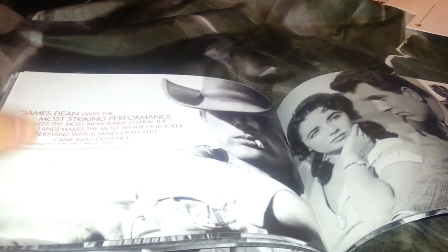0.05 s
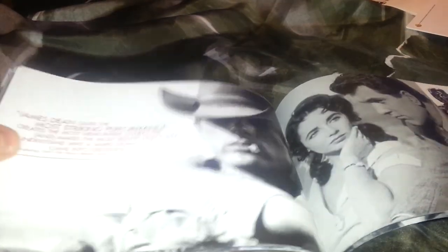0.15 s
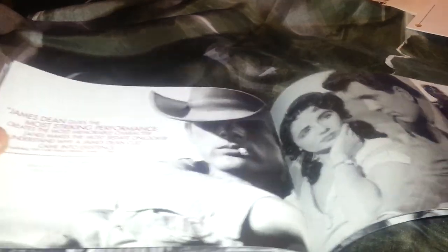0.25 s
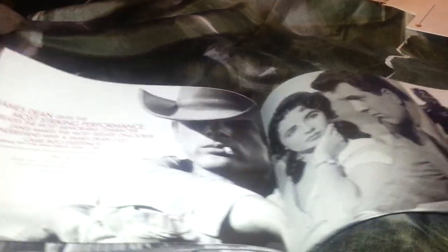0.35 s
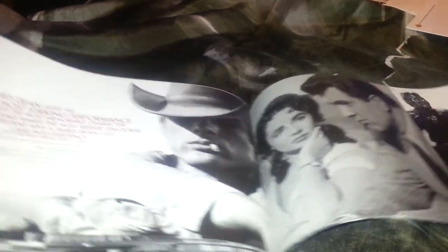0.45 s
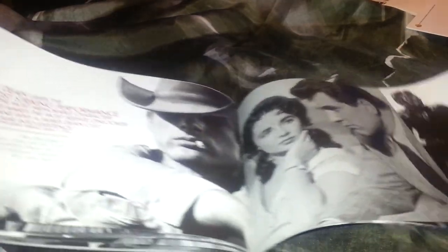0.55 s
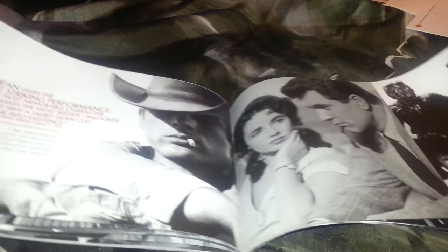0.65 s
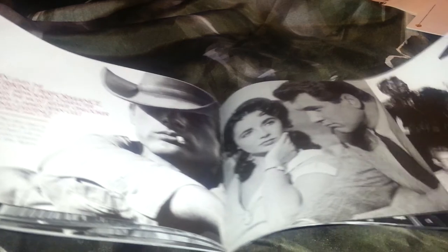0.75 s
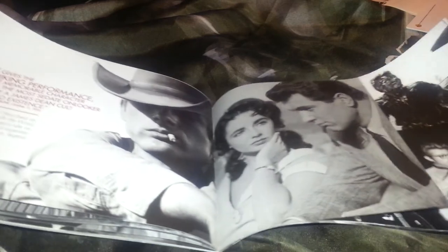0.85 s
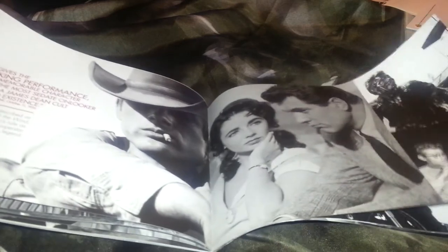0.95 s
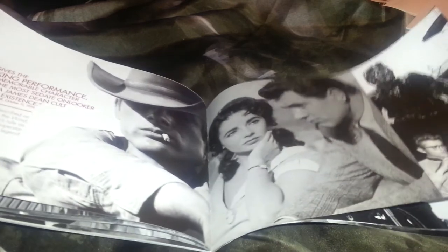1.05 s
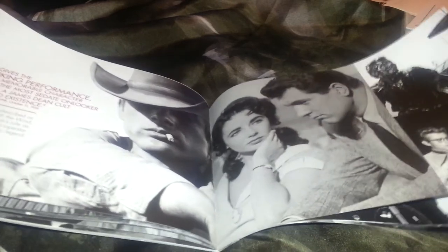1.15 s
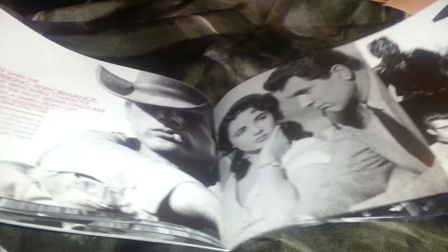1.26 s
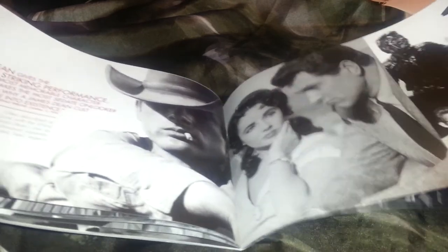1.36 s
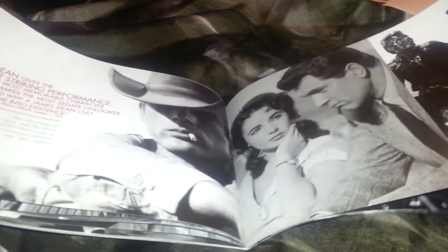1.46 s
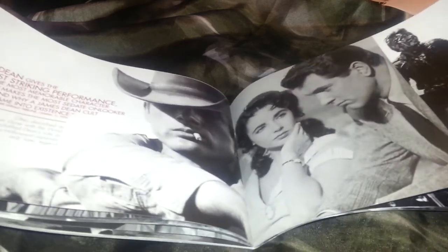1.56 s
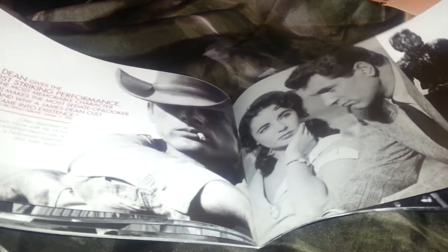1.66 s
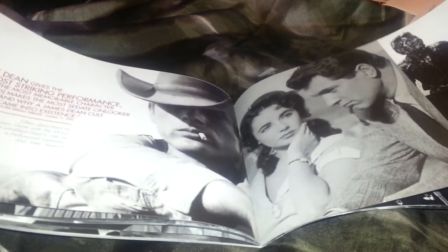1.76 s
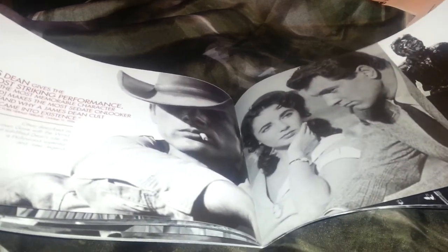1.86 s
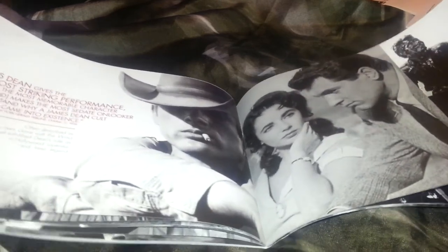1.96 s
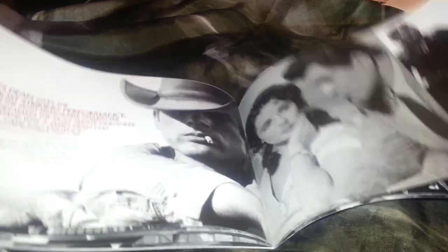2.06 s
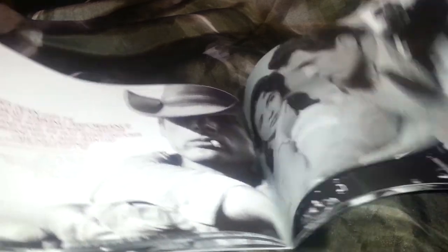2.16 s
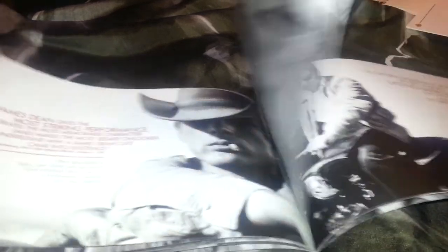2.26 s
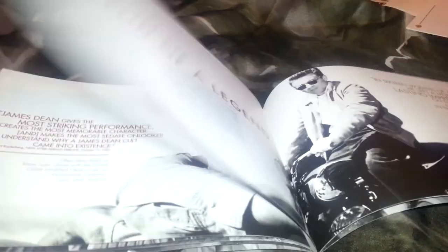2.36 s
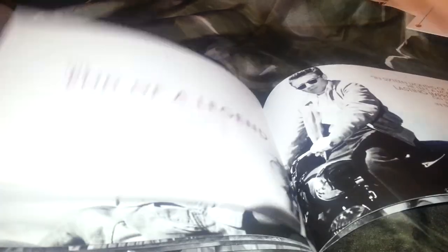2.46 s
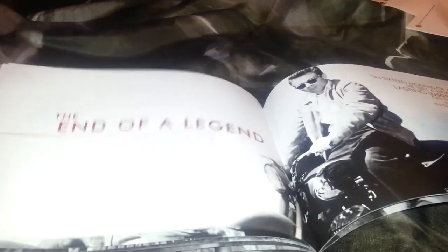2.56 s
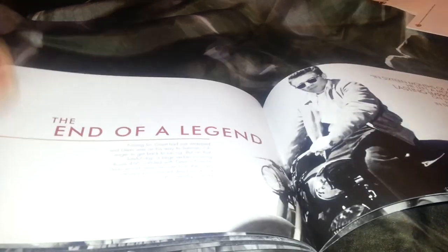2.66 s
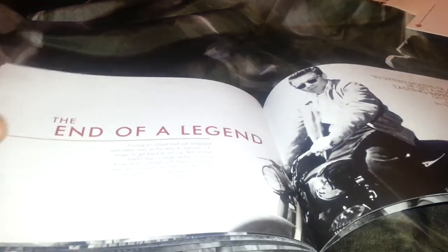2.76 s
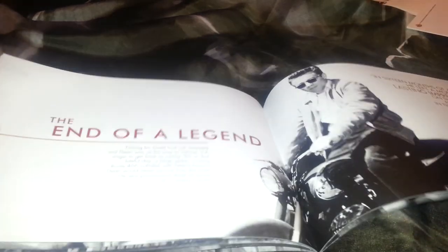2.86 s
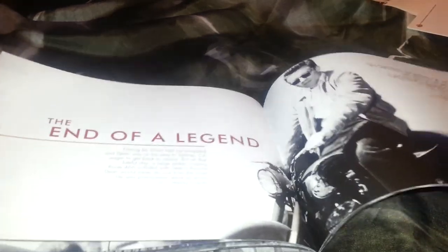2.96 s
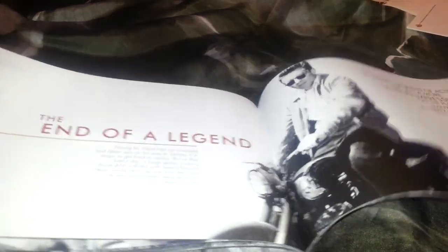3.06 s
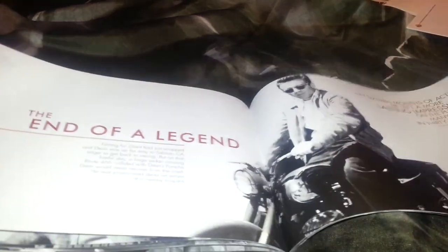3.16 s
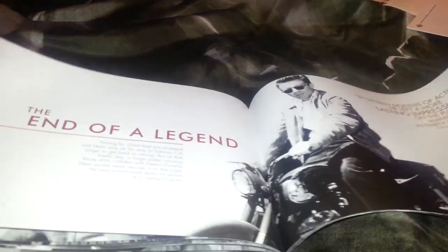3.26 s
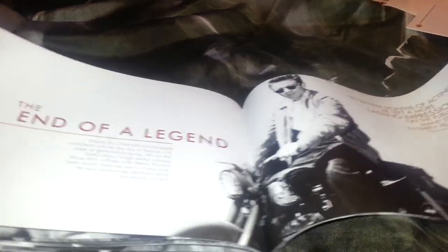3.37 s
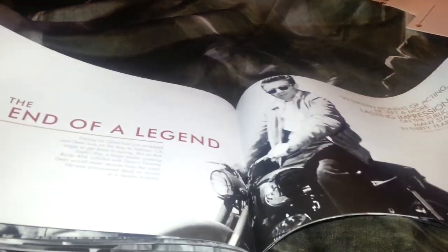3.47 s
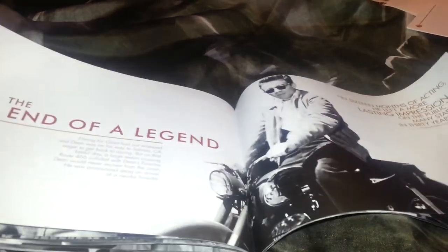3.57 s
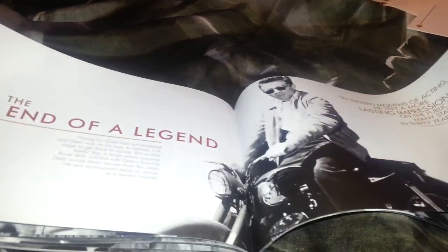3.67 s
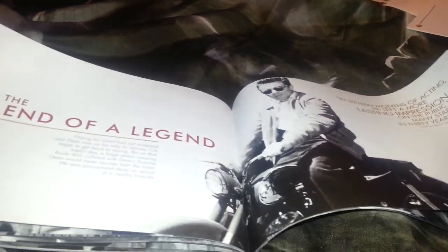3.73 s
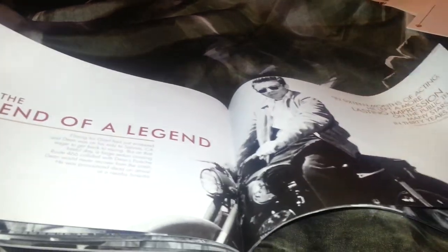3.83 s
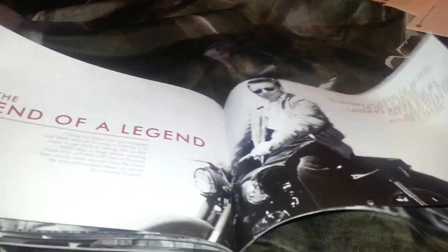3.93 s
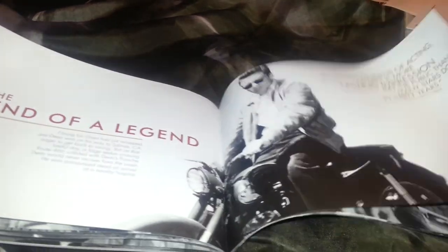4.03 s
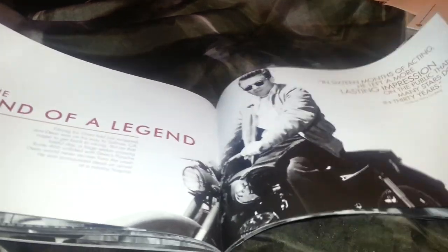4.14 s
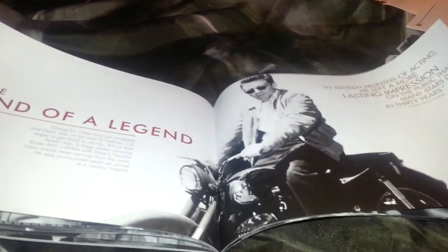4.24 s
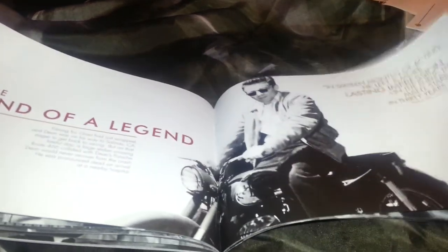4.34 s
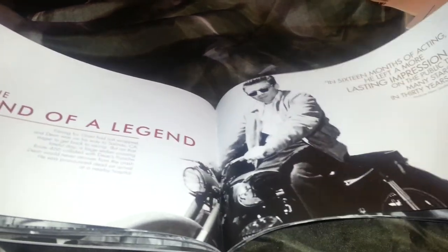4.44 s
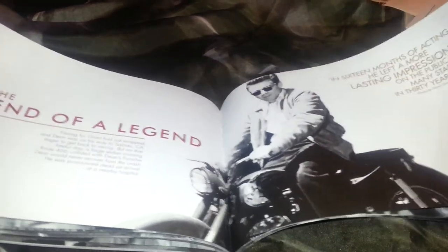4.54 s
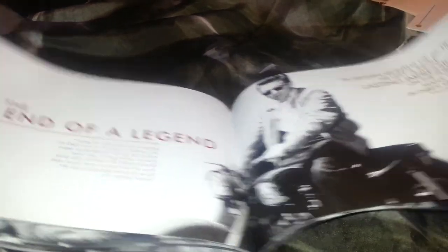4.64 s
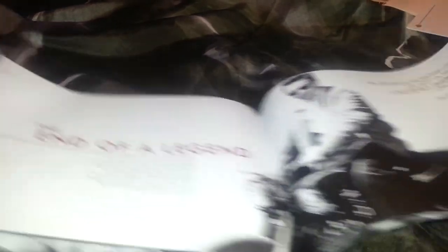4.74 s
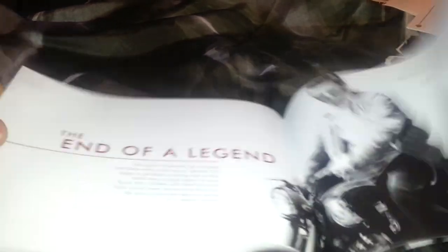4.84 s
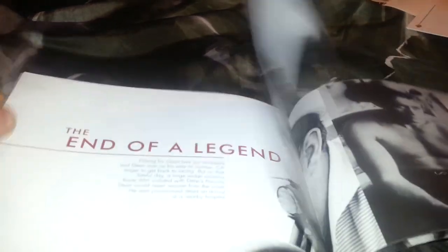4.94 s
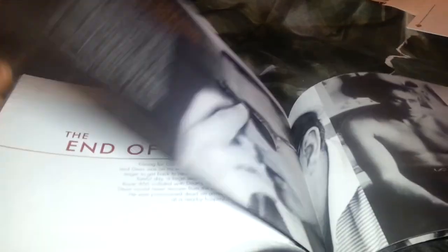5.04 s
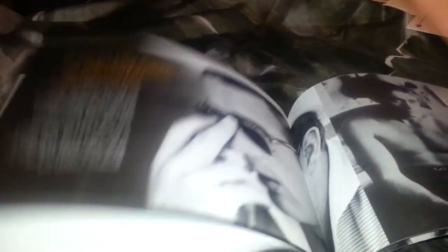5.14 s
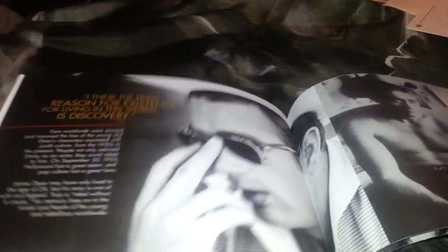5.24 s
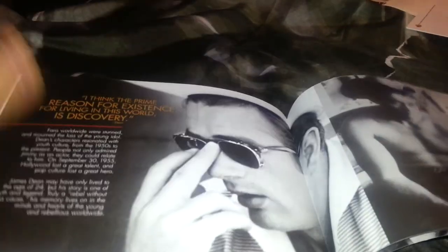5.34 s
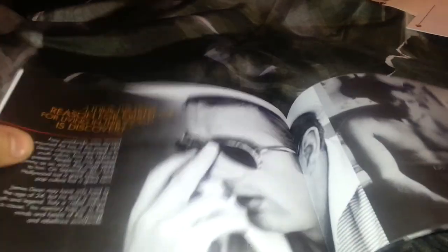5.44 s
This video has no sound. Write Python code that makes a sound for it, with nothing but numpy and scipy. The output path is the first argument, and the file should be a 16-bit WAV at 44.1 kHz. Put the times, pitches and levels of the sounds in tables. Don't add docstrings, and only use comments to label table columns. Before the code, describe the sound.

A close, dry stereo sound of a glossy paper booklet being leafed through in a small quiet room, with steady soft air hiss and a faint, wavering low appliance hum. Light finger rustles open it; from about 0.7 to 1.2 s a thumb riffles page edges in a run of soft, scuffing ticks. Rustles continue near 1.3 s, then grow faint with tiny skin squeaks until about 2.2 s. At 2.27 s a page flips: a loud, bright crackle, buckling ring and low puff of air, gone in about a tenth of a second. Quiet rubbing follows, swelling around 3.5 s. Crisper edge ticks run from 3.7 to 4.0 s, then rustling and a small squeak. A sharp tick at 4.86 s leads into the second flip at 4.95 s, shorter, harder and snappier. Small rustles, squeaks and a light pop finish by 5.5 s, with faint binding creaks beneath the handling.

```python
import sys
import numpy as np
from scipy import signal
from scipy.fft import rfft, irfft, next_fast_len
from scipy.io import wavfile
from scipy.ndimage import uniform_filter1d, map_coordinates

SR = 44100
rng = np.random.default_rng(int(sys.argv[2]) if len(sys.argv) > 2 else 0)


def materialize(psi):
    bounded = np.clip(np.atleast_2d(psi).T, -1, 1)
    quanta = np.round(bounded * 32767).astype(np.int16)
    wavfile.write(sys.argv[1], SR, quanta)


def undo_db(level):
    steps = np.asarray(level, float) / 20
    return 10 ** steps


N = 242550

# start_s, snap_db, scuff_re_snap_db, hiss_re_snap_db, snap_hz
SOFT_EDGES = [(0.7045, -32, -5.5, -13.5, 2450), (0.8008, -36, 3, -11.5, 2160),
              (0.814, -24.5, -1, -16, 2650), (0.8845, -30, 0.5, -17, 2260),
              (0.9213, -25.5, -5, -17.5, 1990), (0.9819, -30, -0.5, -18, 2220),
              (1.0227, -28, -3.5, -19, 2150), (1.061, -32, -4.5, -16.5, 2200),
              (1.105, -39, -1.5, -13, 2660), (1.1397, -32.5, -4, -15.5, 2540),
              (1.1751, -32.5, -2.5, -17.5, 2660), (1.212, -41, -0.5, -14, 2940),
              (5.2117, -39, -5, -18, 1990), (5.434, -42, 2.5, -13, 1350)]
# start_s, snap_db,
# scuff_re_snap_db, hiss_re_snap_db, snap_hz
CRISP_EDGES = [(2.577, -51, -11, -22.5, 2320), (3.683, -34.5, 0.5, -15.5, 1560),
               (3.754, -29.5, -5, -17.5, 2080), (3.802, -26.5, -9, -17.5, 2000),
               (3.861, -22, -11.5, -22, 2250), (3.905, -22.5, -9.5, -21.5, 2150),
               (3.971, -39, -5, -7.5, 2100), (4.117, -40.5, 0, -23, 1970), (4.371, -33, -13, -14, 1200),
               (4.829, -32, -6.5, -35, 1650), (4.862, -17.5, -19.5, -33, 2800),
               (2.273, -16, -21, -27, 1900), (4.9512, -15.5, -18, -42, 1410)]
SOFT_THUMP_DB, CRISP_THUMP_DB, THUMP_TOP_DB = -21, -14, -42.5

# start_s, level_db, pitch_hz, t60_s,
# crackle_re_level_db
BUCKLES = [(2.247, -35, 1480, 0.072, 5), (2.261, -24, 4300, 0.029, 3.5),
           (2.268, -14, 1480, 0.079, -18), (2.27, -13.5, 1722, 0.074, -3),
           (2.274, -12.5, 1970, 0.042, 2), (2.284, -16.5, 2360, 0.044, 0.5),
           (2.288, -18, 1930, .04, -8), (2.298, -20, 1280, 0.098, -9), (2.307, -22, 1380, 0.081, -4),
           (2.317, -16.5, 1390, 0.059, -13), (2.336, -25.5, 1340, 0.067, -14),
           (2.345, -31.5, 1500, 0.044, -10),
           (4.858, -30, 990, 0.059, 7), (4.925, -13.5, 3100, 0.014, -6),
                  (4.926, -15, 1520, 0.019, -17), (4.934, -25, 1160, 0.077, 1), (4.942, -13, 1150, .03, -6),
                  (4.947, -8, 1120, 0.027, 0), (4.95, -8.5, 1210, 0.023, 5), (4.949, -8, 3760, 0.032, -7),
                  (4.957, -19.5, 2810, 0.035, -7), (4.963, -20, 3640, 0.017, -11),
                  (4.983, -29.5, 1420, .04, -6), (4.99, -23, 1280, 0.049, -4),
                  (5.463, -28.5, 1280, 0.03, -4.5)]
BUCKLE_HISS_DB = -35
# start_s, level_db, t60_s
WHIPS = [
    (2.273, -24.5, 0.044),
    (4.95, -24, .017),
]
# start_s, level_db, pitch_hz
SLAPS = [
    (1.369, -45, 288),
    (2.268, -25, 427),
    (2.297, -34.5, 480),
    (4.159, -45, 188),
    (4.945, -31.5, 436),
]

# peak_s, rise_s, fall_s, rustle_db, edge_hiss_re_rustle_db
STROKES = [(0.0, .03, 0.035, -50, -6.5), (.182, 0.065, 0.049, -46, -10.5),
           (.45, 0.5, 0.44, -56, -7.5), (.616, 0.037, 0.051, -41, -9), (.95, 0.71, .5, -52.5, -3),
           (1.272, 0.037, 0.048, -41.5, -6), (1.325, 0.041, 0.049, -41.5, -1),
           (1.492, 0.086, 0.034, -50, -1), (1.692, 0.017, 0.058, -55, 0), (1.81, .04, .04, -56, -3.5),
           (1.914, 0.023, 0.15, -50.5, -5), (2.216, 0.037, 0.068, -48, -5),
           (2.31, 0.15, 0.12, -50, -5.5),
           (2.579, 0.0058, 0.088, -49.5, -8.5), (2.922, 0.027, 0.092, -53.5, -10),
                  (3.158, 0.14, 0.12, -56.5, -4), (3.29, 0.012, 0.044, -51, -10),
                  (3.35, 0.043, 0.22, -58, 7.5), (3.45, 0.11, 0.088, -46, -6.5),
                  (3.546, .03, 0.03, -41, -8), (3.632, 0.1, 0.027, -40.5, -16),
                  (3.8, 0.29, .2, -52.5, -2.5), (3.976, 0.0063, 0.025, -40.5, -6),
                  (4.077, 0.095, 0.075, -40.5, -6), (4.236, 0.052, 0.16, -47.5, -1),
                  (4.381, 0.022, 0.072, -43, -3.5), (4.69, 0.12, 0.29, -46, -5),
                  (4.915, 0.13, 0.017, -42, -6), (4.96, 0.053, 0.077, -37.5, -30),
                  (5.215, 0.0062, .08, -52, 1), (5.256, 0.0088, .03, -41, -6.5),
                  (5.29, 0.027, 0.037, -43, -7), (5.368, 0.033, .08, -50, -11),
                  (5.462, 0.039, 0.056, -41.5, -10)]
STROKE_DROP_DB, STROKE_ROUND = 13.5, 1.39
# time_s, pitch_hz, left_re_right_db
BEND = [(0.0, 3100, -2), (.6, 3320, 2), (1.3, 2860, 2.5), (1.85, 2490, 1), (2.2, 3230, 0), (2.38, 2000, -1),
        (2.6, 3270, 0), (3.2, 3050, -2), (3.5, 2580, 5), (4.1, 3060, 3.5), (4.38, 2530, 1),
        (4.72, 3470, -1), (5.2, 2960, -1), (5.5, 2350, -1)]
BEND_BANK_HZ = np.geomspace(1800, 4000, 5)

# start_s, length_s, pitch_hz,
# width_hz, level_db
SQUEAKS = [(1.772, 0.053, 2190, 300, -54), (1.884, 0.07, 2420, 330, -54), (1.948, 0.13, 2560, 260, -58),
           (2.911, 0.037, 2714, 600, -49.5), (3.36, 0.16, 1380, 800, -52.5),
           (3.522, 0.16, 1500, 900, -48.5), (4.03, 0.1, 3120, 500, -42.5), (4.654, 0.083, 5370, 700, -54),
           (5.245, 0.022, 1420, 900, -45.5), (5.35, 0.05, 2620, 400, -56), (5.442, 0.05, 1240, 250, -41.5)]
GRIP_DB, GRIP_FOLLOWS, GRIP_S = -58.5, 0.76, 0.29

# freq_hz, density_db
SHEET = [(290, -16), (500, -15.5), (1030, -8), (1600, -3), (2630, 2), (3850, 1.5), (5460, -9), (6060, -37),
         (7290, -11), (8000, -26), (10400, -26.5), (17600, -120)]
# freq_hz, density_db
HISS = [(3240, -7), (5500, -1.5), (6160, -4.5), (7340, -4.5), (11300, -7), (14500, -15)]
# freq_hz, density_db
CRACKLE = [(410, -49.5), (700, -26), (1130, 1), (1960, -8.5), (2690, 3), (3690, -2), (4500, -5.5),
           (6200, -35), (8000, -28), (10400, -44), (17600, -120)]

# freq_hz, density_db
AIR = [(15, -52), (25, -14), (63, -17), (92, -10.5), (127, -7), (210, -6.5), (275, -6), (340, -7.5),
       (679, -13), (796, -12.5), (2020, -20), (3540, -19), (6020, -28), (8070, -25), (14500, -24.5)]
AIR_DB = -54.5
# freq_hz, correlation
ALIKE = [(60, 0.4), (130, 0.34), (290, 0.41), (640, 0.028), (1400, 0.16), (15000, 0)]
# freq_hz, unsteadiness_per_s, relative_level_db
HUM = [(121.2, 4.4, 1), (162.6, 9, -8.5), (269.5, 24, -2.5)]
DRONE_DB, DRONE_SWING_DB, DRONE_KNOTS_PER_S = -61.5, 1.8, 7.2

LEFT_LEAD_SAMPLES = 7
TOP_HZ = 14750


def unit(x):
    return x / np.sqrt(np.mean(x ** 2) + 1e-20)


def along(points, hz):
    point_hz, value = np.transpose(points)
    return np.interp(np.log(hz + 1), np.log(point_hz + 1), value)


def filtered(x, response):
    n = x.shape[-1]
    size = next_fast_len(n + 8192)
    return irfft(rfft(x, size) * response(np.fft.rfftfreq(size, 1 / SR)), size)[..., :n]


def peak(hz, width_hz):
    return lambda f: 1j * f * width_hz / (hz * hz - f * f + 1j * f * width_hz)


def wobble(knots_per_s, n):
    knots = rng.standard_normal(int(n * knots_per_s / SR) + 4)
    return map_coordinates(knots, [np.arange(n) * knots_per_s / SR])


def ports(x, alike):
    share = np.clip(alike, 0, 1)
    right = share * x[0] + np.sqrt(1 - share ** 2) * x[1]
    return np.array([x[0], np.roll(right, LEFT_LEAD_SAMPLES)])


def grain(n, spectrum, grit_db, alike):
    catches = rng.standard_normal((2, n)) * undo_db(grit_db * wobble(900, n))
    coloured = filtered(catches, lambda hz: undo_db(along(spectrum, hz)))
    return unit(ports(coloured, alike))


def add(track, start_s, sound):
    k = round(start_s * SR)
    track[:, k:k + sound.shape[1]] += sound


def edge_kick(t, hz, thump_re_snap_db):
    pulse = np.exp(-((t - 0.0008) / 0.00009) ** 2)
    release = pulse * (0.3 * rng.standard_normal((2, len(t))) - 1)
    snap = filtered(release, lambda f: peak(0.9 * hz, 0.6 * hz)(f) - undo_db(-5) * peak(4300, 3000)(f))
    thump = filtered(release, lambda f: peak(400, 450)(f) * peak(400, 900)(f))
    kick = undo_db(7) * snap / abs(snap).max()
    return kick + undo_db(thump_re_snap_db + 13) * thump / abs(thump).max()


def edge_scuff(t, hz, scuff_db, hiss_db):
    rub = grain(len(t), SHEET, grit_db=3, alike=0.55)
    ring_hz = hz * undo_db(rng.normal(0.61, 0.87))
    rub = unit(rub + 1.6 * filtered(rub, peak(ring_hz, 0.17 * hz)))
    hiss = (1 - np.exp(-t / 0.00077)) * grain(len(t), HISS, grit_db=2, alike=0.41)
    fade = np.exp(-(t / 0.015) ** 1.86) * (1 - np.exp(-t / 0.0015))
    return fade * (undo_db(scuff_db) * rub + undo_db(hiss_db + 4.5) * hiss)


def edges():
    out, t = np.zeros((2, N + SR)), np.arange(SR // 8) / SR
    for group, thump_db in ((SOFT_EDGES, SOFT_THUMP_DB), (CRISP_EDGES, CRISP_THUMP_DB)):
        for start_s, snap_db, scuff_db, hiss_db, hz in group:
            scuff = edge_scuff(t, hz, scuff_db, hiss_db)
            kick = edge_kick(t, hz, min(thump_db, THUMP_TOP_DB - snap_db))
            add(out, start_s, undo_db(snap_db) * (scuff + ports(kick, 1.0)))
    return out[:, :N] * undo_db([[1.5], [-1.5]])


def buckle(t, hz, t60_s, crackle_db):
    fade = undo_db(-60 * t / t60_s) * (1 - np.exp(-t / 0.00017))
    noise = rng.standard_normal((2, len(t)))
    ring = unit(filtered(noise, lambda f: peak(hz, 0.3 * hz)(f) * peak(hz, 0.7 * hz)(f)))
    crackle = undo_db(crackle_db) * grain(len(t), CRACKLE, grit_db=3, alike=0.3)
    hiss = (1 - np.exp(-t / 0.003)) * grain(len(t), HISS, grit_db=3, alike=0.3)
    hiss *= undo_db(crackle_db + BUCKLE_HISS_DB)
    return fade * (undo_db([[2.5], [-2.5]]) * ports(ring, 0.086) + crackle + hiss)


def whip(t, t60_s):
    fade = undo_db(-60 * t / t60_s) * (1 - np.exp(-t / 0.0042))
    return fade * grain(len(t), HISS, grit_db=2.5, alike=0.1)


def slap(t, hz):
    push = rng.standard_normal((2, len(t))) * undo_db(-60 * t / 0.036) * (1 - np.exp(-t / 0.0018))
    push = filtered(push, lambda f: peak(0.85 * hz, 0.7 * hz)(f) ** 2)
    return push / abs(push).max(axis=1, keepdims=True)


def flips():
    out, t = np.zeros((2, N + SR)), np.arange(SR // 8) / SR
    for start_s, db, hz, t60_s, crackle_db in BUCKLES:
        add(out, start_s, undo_db(db - 4.5) * buckle(t, hz, t60_s, crackle_db))
    for start_s, db, t60_s in WHIPS:
        add(out, start_s, undo_db(db) * whip(t, t60_s))
    for start_s, db, hz in SLAPS:
        add(out, start_s, undo_db(db + 5) * slap(t, hz))
    return out[:, :N]


def strokes():
    peak_s, rise_s, fall_s, db, hiss_db = np.transpose(STROKES)[:, :, None]
    t = np.arange(0, N + 32, 32) / SR
    away = np.where(t < peak_s, (peak_s - t) / rise_s, (t - peak_s) / fall_s)
    rustle_db = db - STROKE_DROP_DB * away ** STROKE_ROUND
    curves = []
    for each_db in (rustle_db, rustle_db + hiss_db):
        total_db = 10 * np.log10(np.sum(undo_db(each_db) ** 2, axis=0) + 1e-10)
        curves.append(np.interp(np.arange(N) / SR, t, total_db))
    return curves


def bent_song(rub, hz):
    place = np.interp(np.log(hz), np.log(BEND_BANK_HZ), np.arange(len(BEND_BANK_HZ)))
    song = np.zeros_like(rub)
    for k, centre_hz in enumerate(BEND_BANK_HZ):
        share = np.sqrt(np.clip(1 - abs(place - k), 0, 1))
        song += share * unit(filtered(rub, peak(centre_hz, 0.46 * centre_hz)))
    return song


def fingers():
    sheet_db, hiss_db = strokes()
    time_s, bend_hz, bend_pan_db = np.transpose(BEND)
    t = np.arange(N) / SR
    hz = np.interp(t, time_s, bend_hz)
    pan_db = np.clip(np.interp(t, time_s, bend_pan_db), -6, 6) * np.array([[0.5], [-0.5]])
    clumps = wobble(70, N)
    rub = grain(N, SHEET, grit_db=3.5, alike=0.7)
    sheet = undo_db(sheet_db - 3 + 1.2 * clumps + pan_db) * (rub + undo_db(-6) * bent_song(rub, hz))
    return sheet + undo_db(hiss_db + 1.5 * clumps) * grain(N, HISS, grit_db=0, alike=0.038)


def squeaks():
    out = np.zeros((2, N + SR))
    for start_s, length_s, hz, width_hz, db in SQUEAKS:
        n = round(length_s * SR)
        noise = rng.standard_normal((2, SR // 5))
        rub = unit(filtered(noise, lambda f: peak(hz, width_hz)(f) ** 2))[:, :n]
        add(out, start_s, undo_db(db) * np.hanning(n) ** 0.5 * ports(rub, 0.18))
    return out[:, :N]


def binding_creak():
    spectrum = [(90, -45), (180, 5), (500, 4.5), (1200, -6.5), (2500, -21)]  # freq_hz, density_db
    creak = grain(N, spectrum, grit_db=-1.5, alike=0.88)
    effort = uniform_filter1d(undo_db(strokes()[0]) ** 2, round(GRIP_S * SR))
    effort_db = 10 * np.log10(abs(effort) + 1e-10)
    grip_db = GRIP_DB + GRIP_FOLLOWS * (effort_db + 50.5)
    return undo_db(grip_db - 4 + 3.7 * wobble(24.94, N)) * creak


def room(x):
    t = np.arange(SR // 3) / SR
    tail = rng.standard_normal((2, len(t))) * undo_db(-60 * t / 0.16)
    tail = filtered(tail, peak(1060, 4800))
    delayed = np.pad(x, ((0, 0), (200, 0)))
    return signal.fftconvolve(delayed, tail / np.linalg.norm(tail[0]), axes=1)[:, :N]


def room_air():
    def mid_side(hz):
        angle = np.arccos(np.clip(along(ALIKE, hz), -1, 1)) / 2
        return undo_db(along(AIR, hz)) * [np.cos(angle), np.sin(angle)]

    mid, side = filtered(rng.standard_normal((2, N)), mid_side)
    return undo_db(AIR_DB + 0.2 * wobble(2.62, N)) * unit(np.array([mid + side, mid - side]))


def drone():
    t = np.arange(N) / SR
    lines = np.zeros(N)
    for hz, knots_per_s, db in HUM:
        level = undo_db(db + 3.5 + 3.2 * wobble(knots_per_s, N))
        lines += level * np.sin(2 * np.pi * hz * t + 0.57 * wobble(knots_per_s, N))
    return undo_db(DRONE_DB + DRONE_SWING_DB * wobble(DRONE_KNOTS_PER_S, N)) * lines


def scene():
    pages = edges() + flips()
    close = pages + undo_db(-16.5) * room(pages) + fingers() + squeaks() + binding_creak()
    close = filtered(close, lambda hz: (1j * hz / (140 + 1j * hz)) ** 2)
    return close + room_air() + drone()


def roll_off(x):
    return signal.sosfilt(signal.butter(12, 15560, fs=SR, output="sos"), x)


def record(dry):
    full = dry / (1 + np.abs(dry) ** 8) ** (1 / 8)
    mix = filtered(full, lambda hz: np.where(hz < TOP_HZ, 1j * hz / (45 + 1j * hz), undo_db(-32)))
    return roll_off(mix)


dry = scene()
out = record(dry)
materialize(out)
```